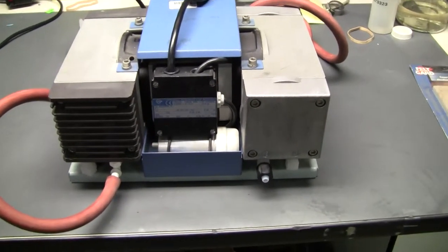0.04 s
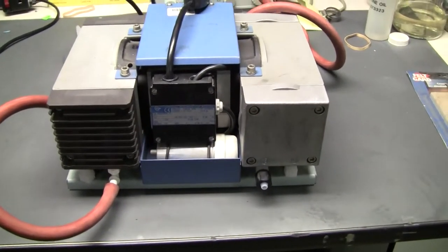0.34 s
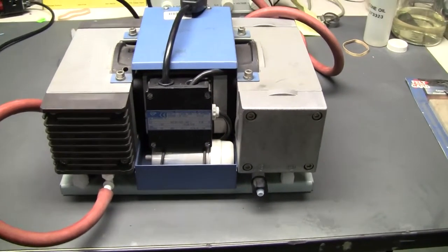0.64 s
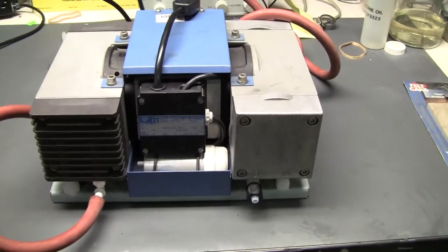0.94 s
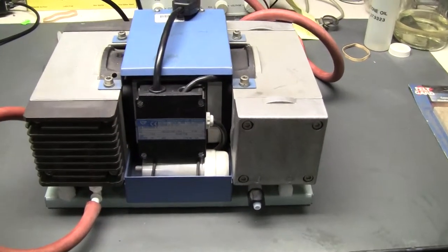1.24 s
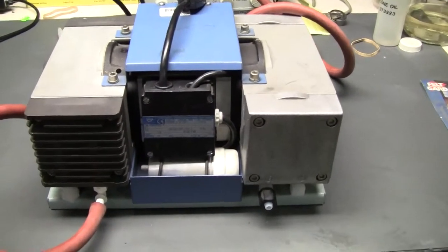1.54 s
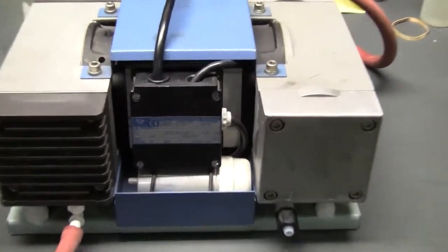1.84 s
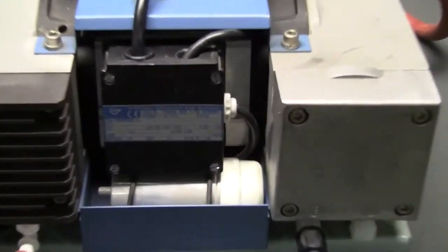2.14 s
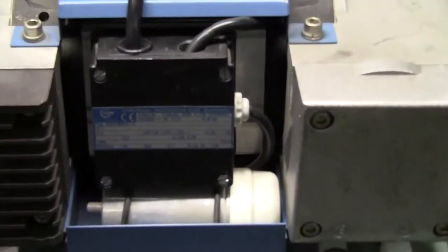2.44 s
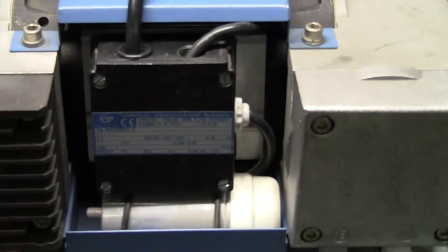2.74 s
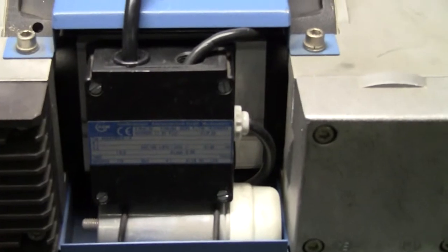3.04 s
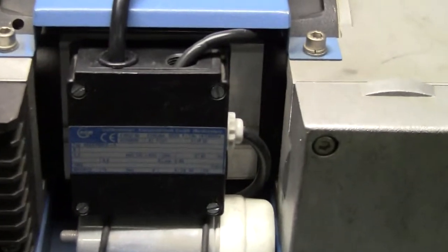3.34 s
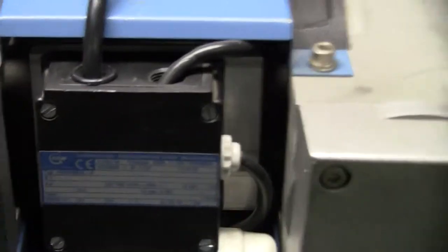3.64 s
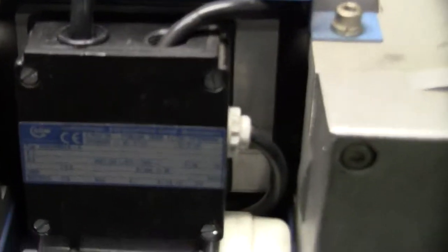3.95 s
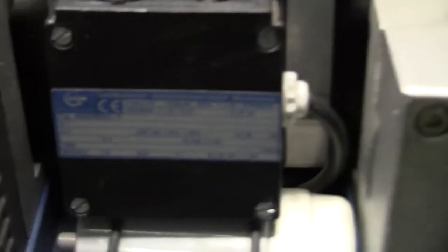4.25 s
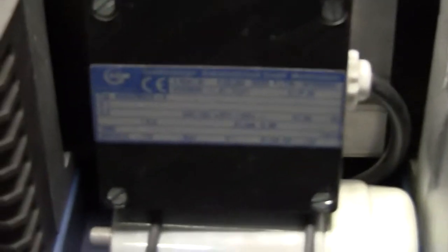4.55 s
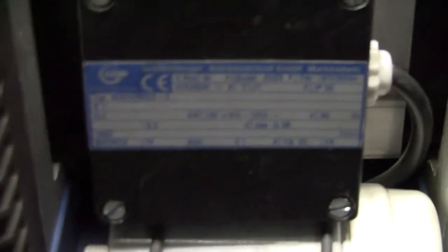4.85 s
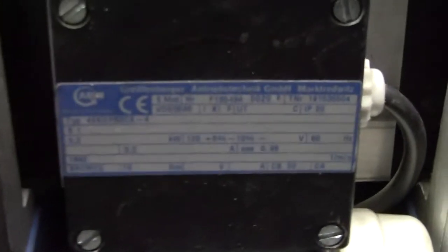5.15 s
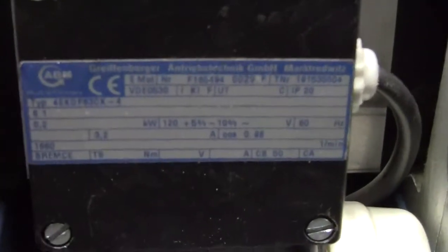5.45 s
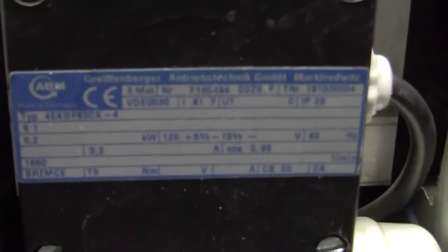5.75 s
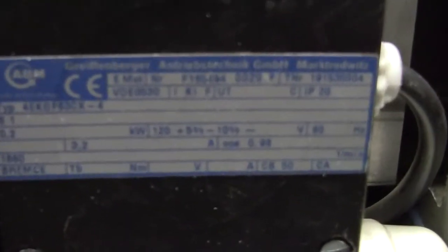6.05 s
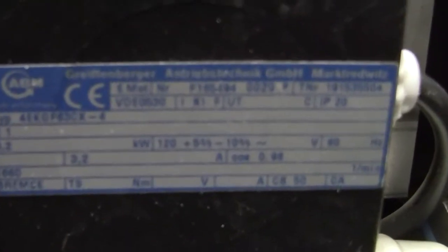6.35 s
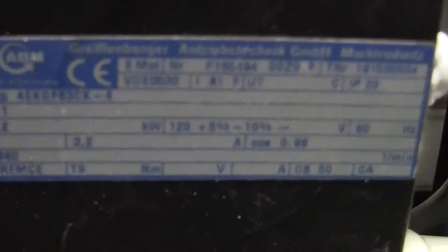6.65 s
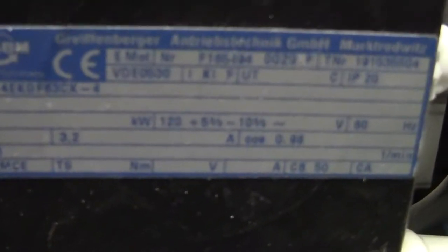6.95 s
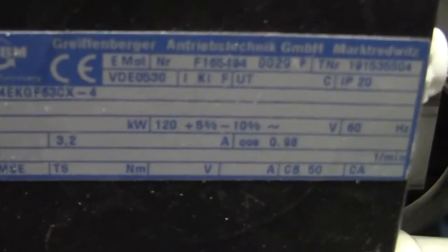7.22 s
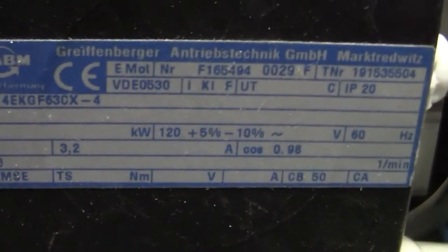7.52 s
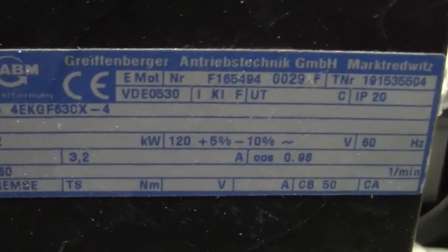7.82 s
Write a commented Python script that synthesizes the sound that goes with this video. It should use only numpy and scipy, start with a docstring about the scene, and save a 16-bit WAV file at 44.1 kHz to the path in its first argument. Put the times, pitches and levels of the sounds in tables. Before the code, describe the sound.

A small diaphragm vacuum pump is already running on a lab bench and keeps the same speed for the whole eight seconds. It knocks rapidly and evenly, about twenty-nine times a second, each stroke ringing the metal housing and carrying crisp, high valve ticks. Behind this chatter are a steady motor hum, a thin bearing whine and a faint fan hiss. The sound is dry, with barely any echo. From about 3 to 6 seconds the stereo microphone moves in from facing the whole pump to right beside the motor; the ringing changes colour while the loudness stays much the same. From about 5.3 seconds to the end, cooling air buffets the microphone in short, irregular, low gusts. Two very soft, high swishes pass at around 5.8 and 6.3 seconds. The pump is still running at the end.

```python
"""A small diaphragm vacuum pump on a lab bench, heard on a stereo microphone that moves slowly in.
Once a shaft turn the diaphragm knocks, the metal housing rings and the valves tick shut, with a very
short scatter off the bench and casing. Behind that the motor hums, its bearing whines, its fan hisses.
The microphone starts facing the whole pump and ends right at the motor, where the cooling air
buffets it and two soft, high swishes are heard."""
import sys
import numpy as np
from scipy import signal
from scipy.fft import rfft, irfft, next_fast_len
from scipy.io import wavfile
from scipy.ndimage import uniform_filter1d, minimum_filter1d

SR = 44100
rng = np.random.default_rng(int(sys.argv[2]) if len(sys.argv) > 2 else 0)


def dump(signal):
    """Clip the signal to [-1, 1] and save it as 16-bit WAV at the path in sys.argv[1]."""
    limited = np.clip(np.atleast_2d(signal).T, -1, 1)
    pcm = np.round(limited * 32767).astype(np.int16)
    wavfile.write(sys.argv[1], SR, pcm)


N = 351918
LEAD = SR // 2  # samples of run-up before the scene
SIZE = next_fast_len(N + 2 * LEAD, True)
TIME = (np.arange(SIZE) - LEAD) / SR
HZ = np.fft.rfftfreq(SIZE, 1 / SR) + 1e-6
SHAFT_HZ, MAINS_HZ, BEARING_HZ, ROTOR_SLOTS = 29.216, 59.9, 245.35, 22

# the microphone's way in: t/s, closeness (0 = far, facing the whole pump; 1 = close, at the motor)
CLOSENESS = [(0, 0.034), (2.9, 0.046), (3.7, 0.34), (4.4, 0.57), (5.8, 0.98), (6.6, 0.97), (8, 0.99)]
# the pump's level as the microphone sways: t/s, level/dB
MIC_SWAY = [(0, -0.5), (2.8, -0.14), (5.2, 0.3), (6.1, -0.5), (6.6, 1), (8, 1.4)]
# how alike diffuse sound is at the microphone's two ports: f/Hz, likeness (1 = the same)
PORT_LIKENESS = [(60, 1), (200, 0.86), (1200, .98), (3000, 1), (7000, 0.73), (15000, 0.15)]
# left port over right port: f/Hz, level/dB
PORT_BALANCE = [(100, 0), (250, 0.4), (650, -1.7), (1300, -1.4), (2400, -1.5), (5000, -0.4), (8000, -2.5),
                (13000, 0.5)]
# lead of the left port: f/Hz, phase/rad
PORT_LEAD = [(60, -0.15), (200, 0.11), (340, -0.27), (700, -0.16), (1200, 0.03), (2400, 0.38), (5000, -0.2),
             (7200, -0.39), (9000, 0)]
# early reflections off casing, bench and walls: delay/s, gain far, gain close
REFLECTIONS = [(0.0011, -0.12, -0.31), (0.00228, -0.17, 0.14), (0.0035, -0.057, -0.11),
               (0.00511, 0.15, -0.08), (0.00852, 0.1, -0.009), (0.01206, -0.053, -0.07),
               (0.01579, 0.12, 0.095), (0.01953, -0.11, -0.035)]
# soft, high swishes: middle t/s, half length/s, level/dB
HIGH_SWISHES = [(5.807, .028, -48), (6.26, .09, -49)]
# noise density of the fan air: f/Hz, level/dB
FAN_SPECTRUM = [(25, -85), (100, -87), (200, -72.5), (420, -66), (650, -63.5), (1050, -57.5), (1550, -63),
                (2300, -68.5), (2750, -73), (3900, -78), (5600, -79), (8500, -89.5), (11500, -88),
                (15000, -101)]
# eddies on the microphone: f/Hz, relative level/dB
EDDY_SPECTRUM = [(20, -25), (50, -18), (85, -3), (125, 3), (230, 3), (400, -3), (800, -7), (2000, -41),
                 (8000, -70)]
# gusts of cooling air: middle t/s, half length/s, level/dB
AIR_GUSTS = [(5.28, 0.033, -29), (5.70, .06, -28), (5.92, 0.035, -21.5), (6.095, 0.023, -23),
             (6.255, 0.024, -20.5), (6.52, 0.043, -24), (6.92, .09, -26), (7.15, 0.023, -23),
             (7.37, .025, -25.5), (7.50, .07, -23.5), (7.93, 0.023, -27)]
# magnetic hum: multiple of the slot rate, plus multiple of the mains, level far/dB, level close/dB
MAGNETIC_TONES = [(0, 2, -50, -47.5), (0, 4, -37, -50.5), (1, 2, -31.5, -36.5), (1, 4, -36.5, -40),
                  (1, 6, -61, -65.5), (1, 8, -37.5, -57), (2, 2, -34.5, -38.5)]
# bearing whine: multiple of the ball rate, level far/dB, level close/dB
BEARING_TONES = [(1, -44.5, -54), (2, -45.5, -60.5), (3, -40, -45), (4, -32.5, -37), (5, -34.5, -35.5),
                 (6, -41.5, -48), (7, -62, -49.5), (8, -45, -53), (9, -47.5, -48.5)]
# the pump rocking on its feet: multiple of the shaft rate, level/dB
ROCKING_TONES = [(1, -73), (2, -58), (3, -62), (5, -48)]
# valve ticks in each turn: t/s after the knock, relative level/dB, rasp decay/s, tilt/(dB per octave)
VALVE_TICKS = [(.0009, -3.5, 0.00046, 2), (.0029, -3, 0.00044, -4), (0.0237, -22.5, 0.0016, 23)]
# modes of the valve plates and pump heads: f/Hz, width/Hz, level far/dB, level close/dB
VALVE_MODES = [(3305, 210, -8.5, -14.5), (4435, 345, -0.5, -8.5), (5710, 470, -6.5, -9.5),
               (7100, 850, 0, -4), (7505, 337, 3, -1.5), (10470, 1400, -12, -19.5),
               (11500, 1140, -15.5, -13), (12600, 730, -26, -16.5), (15970, 660, -13, -23)]
# modes of the metal housing: f/Hz, width/Hz, level far/dB, level close/dB
HOUSING_MODES = [(417.6, 9.5, 9.5, 3), (640.3, 69.6, 6, 4.5), (993, 3.9, -8.5, -20), (1136, 14, -5.5, -8),
                 (1224.0, 8.9, 15.5, -29), (1448, 26, -33, 4.5), (1517, 2.8, -32, 1.5), (1740, 20, 6, -3),
                 (1870, 11, 6, 3.5), (1994, 47, 1, 0), (2379, 26.3, 12.5, -1.5), (2408, 36, -3, 4.5),
                 (2580, 270, -6, 1.0), (2840, 240, -9, 0)]
# the diaphragm's bare knock: f/Hz, level/dB
KNOCK_SPECTRUM = [(30.0, -38.5), (110.0, 1), (200.0, 23.5), (400.0, 22.0), (800.0, 29.5), (1300.0, 17.5),
                  (1800.0, 10.5), (2500.0, 3.5), (3000.0, -18), (5000.0, -15.5), (16000.0, -49)]


def gain_of(db):
    """Decibels to amplitude."""
    return 10 ** (np.asarray(db) / 20)


def unit_rms(x):
    """Scales to rms 1."""
    return x / np.sqrt(np.mean(x ** 2))


def over_time(rows):
    """A time table at every sample."""
    return np.interp(TIME, *np.transpose(rows))


def over_hz(rows):
    """A frequency table at every bin."""
    hz, value = np.transpose(rows)
    return np.interp(np.log(HZ), np.log(hz), value)


def drift(rate_hz):
    """A random wander of rms 1, mostly slower than rate_hz."""
    coarse = irfft(rfft(rng.standard_normal(2048)) / (1 + (HZ[:1025] / rate_hz) ** 2))
    return np.interp(np.linspace(0, 1, SIZE), np.linspace(0, 1, len(coarse)), unit_rms(coarse))


def swells(rows):
    """An envelope with one smooth rise and fall for each row."""
    return sum(gain_of(db) * np.exp(-((TIME - s) / half_s) ** 2) for s, half_s, db in rows)


def delay(s):
    """Frequency response of a delay."""
    return np.exp(-2j * np.pi * HZ * s)


def minimum_phase(db):
    """The promptest response that has this gain curve."""
    log_gain = np.r_[db, db[-2:0:-1]] * np.log(10) / 20
    return np.exp(np.conj(signal.hilbert(log_gain))[:len(HZ)])


def ring(modes, order=1):
    """Far and close responses of a set of modes; coupled pairs (order 2) have steeper skirts."""
    return sum(gain_of([[far_db], [near_db]]) / (1 + 1j * (HZ ** 2 - hz ** 2) / (HZ * width)) ** order
               for hz, width, far_db, near_db in modes)


def approach(far, near):
    """Blends from the far to the close position as the microphone moves in."""
    return far + (near - far) * over_time(CLOSENESS)


def diffuse_pair(common, apart):
    """Two unrelated spectra become left and right signals, least alike in the top treble."""
    same = np.clip(over_hz(PORT_LIKENESS), 0, 1)
    return irfft(common * np.sqrt((1 + same) / 2) + np.array([[1], [-1]]) * apart * np.sqrt((1 - same) / 2))


def scatter(x, t60_s=0.03, far_db=-20, near_db=-24):
    """A very short, diffuse scatter off the bench and casing; it changes as the microphone moves."""
    t = np.arange(LEAD) / SR
    tails = rng.standard_normal((3, LEAD)) * gain_of(-60 * t / t60_s) * (t > .007)
    tails /= np.linalg.norm(tails, axis=1, keepdims=True)
    far, near, apart = rfft(x) * rfft(tails, SIZE)
    return approach(gain_of(far_db) * diffuse_pair(far, apart),
                    gain_of(near_db) * diffuse_pair(near, apart))


def swishes(centre_hz=8800, octaves=0.28):
    """Two brief puffs of high hiss, heard close to the motor."""
    band = 1 / (1 + (np.log2(HZ / centre_hz) / octaves) ** 2)
    hiss = diffuse_pair(*rfft(rng.standard_normal((2, SIZE))) * band)
    return unit_rms(hiss) * swells(HIGH_SWISHES)


def fan(near_db=-4.5, throb_db=0.44):
    """Air rushes through the motor and throbs slightly with the shaft."""
    noise = rfft(rng.standard_normal((2, SIZE))) * np.sqrt(SR / 2)
    air = diffuse_pair(*noise * gain_of(over_hz(FAN_SPECTRUM)))
    return air * gain_of(approach(0, near_db) + throb_db * np.cos(2 * np.pi * SHAFT_HZ * TIME))


def tone(hz, db, waver_db, waver_rad):
    """A sine that wavers in phase, and in level around db rms."""
    amplitude = np.sqrt(2) * gain_of(db + waver_db * drift(2.8))
    return amplitude * np.sin(2 * np.pi * (hz * TIME + rng.random()) + waver_rad * drift(1.6))


def motor():
    """Magnetic hum with its slot tones, bearing whine, and the rocking of the whole pump."""
    hum = sum(tone(slot * ROTOR_SLOTS * SHAFT_HZ + k * MAINS_HZ, approach(far_db, near_db),
                   waver_db=2, waver_rad=0.09) for slot, k, far_db, near_db in MAGNETIC_TONES)
    whine = sum(tone(k * BEARING_HZ, approach(far_db, near_db), waver_db=2.5, waver_rad=0.41)
                for k, far_db, near_db in BEARING_TONES)
    rocking = sum(tone(k * SHAFT_HZ, db, waver_db=-1.5, waver_rad=0.045) for k, db in ROCKING_TONES)
    return hum + whine + rocking


def draught(far_db=-73, near_db=-31, lumps_db=2.5, small_eddy_hz=120):
    """Cooling air buffets the microphone in a stream that grows towards the motor, and in gusts."""
    shared, left, right = rfft(rng.standard_normal((3, SIZE))) * gain_of(over_hz(EDDY_SPECTRUM))
    apart = 2.9 / (1 + (small_eddy_hz / HZ) ** 3)  # large eddies cover both ports, small ones only one
    eddies = irfft((shared + apart * np.array([left, right])) / np.sqrt(1 + apart ** 2))
    stream = gain_of(approach(far_db, near_db) + lumps_db * drift(18))
    return unit_rms(eddies) * np.hypot(stream, swells(AIR_GUSTS))


def valve_slaps(times, uneven_db=0.87, jitter_s=.0001, rasp=0.1, hiss=0.027, hiss_s=0.0046):
    """Mid and side spectra of the valves slapping shut: a click, a short rasp, a dying hiss of air."""
    t, slaps = np.arange(1100) / SR, 0
    for after_s, db, rasp_s, tilt_db in VALVE_TICKS:
        late, strength = rng.standard_normal((2, len(times), 1))
        at = np.round((times[:, None] + after_s + jitter_s * late + t) * SR).astype(int) + LEAD
        envelope = rasp * np.exp(-t / rasp_s) + hiss * np.exp(-t / hiss_s)
        slap = envelope * rng.standard_normal((2, *at.shape))
        slap[0, :, 0] += 1  # the click reaches both ports alike
        train = np.zeros((2, SIZE))
        train[:, at] = gain_of(db + uneven_db * strength) * slap
        slaps = slaps + rfft(train) * gain_of(tilt_db * np.log2(np.clip(HZ, 4000, 11000) / 7500))
    return slaps


def valve_beam_db(peak_db=4, at_closeness=0.55, half_width=0.29):
    """The valves beam their top treble; the microphone crosses the beam on its way in."""
    return peak_db * np.exp(-((over_time(CLOSENESS) - at_closeness) / half_width) ** 2)


def valves(times, gain_db=3.9, wander_db=0.5, top_db=-1.3, bright_db=2, stereo_width=1.18):
    """The slaps ring the valve plates and pump heads; a harder slap is above all a brighter one."""
    mid_slaps, side_slaps = valve_slaps(times)
    plates = ring(VALVE_MODES, order=2)
    spread = stereo_width * np.minimum(HZ / 10000, 1) ** 2  # short waves differ most between the ports
    mid = approach(*irfft(mid_slaps * plates))
    side = approach(*irfft(side_slaps * plates * spread))
    ticks = mid + np.array([side, -side])
    top = irfft(rfft(ticks) / (1 + (9000 / HZ) ** 8))  # treble above 9 kHz
    force = drift(27)
    top_gain = gain_of(top_db + valve_beam_db() + bright_db * force)
    return (ticks + top * (top_gain - 1)) * gain_of(gain_db + wander_db * force)


def stroke_times(first_s=.00088, jitter_s=.00002):
    """One knock a shaft turn; the pump is already running at the start."""
    times = first_s + np.arange(-12, 236) / SHAFT_HZ
    return times + jitter_s * rng.standard_normal(len(times))


def knocks(times, uneven_db=0.72, rebound=0.12, rebound_s=0.003047):
    """The diaphragm knocks at the end of its stroke; its rebound sets the housing ringing."""
    train, taps = np.zeros(SIZE), np.arange(-8, 9)
    place = times[:, None] * SR + LEAD
    at = np.round(place).astype(int) + taps
    strength = gain_of(uneven_db * rng.standard_normal(place.shape))
    train[at] = np.sinc(at - place) * np.hanning(len(taps)) * strength  # impulses between samples
    blows = -rfft(train) * minimum_phase(over_hz(KNOCK_SPECTRUM))
    housing = 1 + delay(rebound_s) * (rebound + ring(HOUSING_MODES))
    paths = 1 + sum(np.array([[far], [near]]) * delay(s) for s, far, near in REFLECTIONS)
    return approach(*irfft(blows * housing * paths))


def scene():
    """The pump, its scatter and its draught at the microphone's two ports."""
    times = stroke_times()
    pump = (knocks(times) + valves(times)) * gain_of(over_time(MIC_SWAY))
    sound = pump + scatter(pump.mean(0)) + motor() + fan() + swishes()
    side = np.array([[.5], [-.5]])  # left, right
    ports = gain_of(side * over_hz(PORT_BALANCE)) * np.exp(1j * side * over_hz(PORT_LEAD))
    heard = irfft(rfft(sound) * ports) + draught()
    return heard[:, LEAD:LEAD + N]


def record(dry, ceiling=.92, limiter_samples=89, edge_hz=15800):
    """A fast limiter rounds off the tallest peaks; a low-pass then limits the band."""
    allowed = np.minimum(ceiling / (abs(dry).max(0) + 1e-9), 1)
    gain = uniform_filter1d(minimum_filter1d(allowed, size=limiter_samples), size=limiter_samples)
    lowpass = signal.firwin(301, edge_hz, window=("kaiser", 9), fs=SR)
    return signal.oaconvolve(dry * gain, lowpass[None], "same")


dry = scene()
out = record(dry)
dump(out)
```